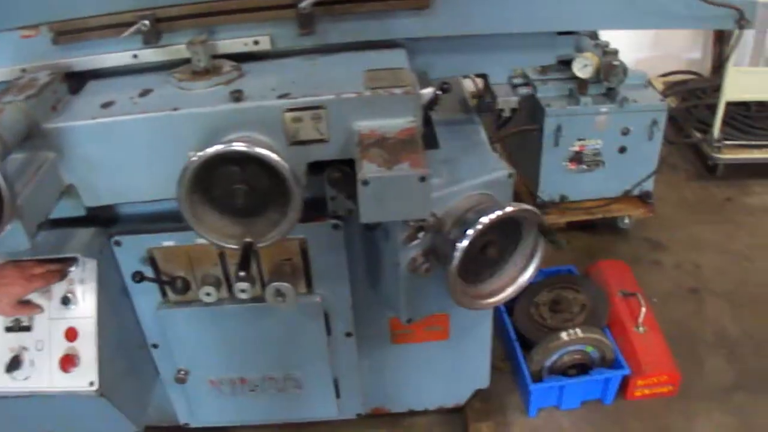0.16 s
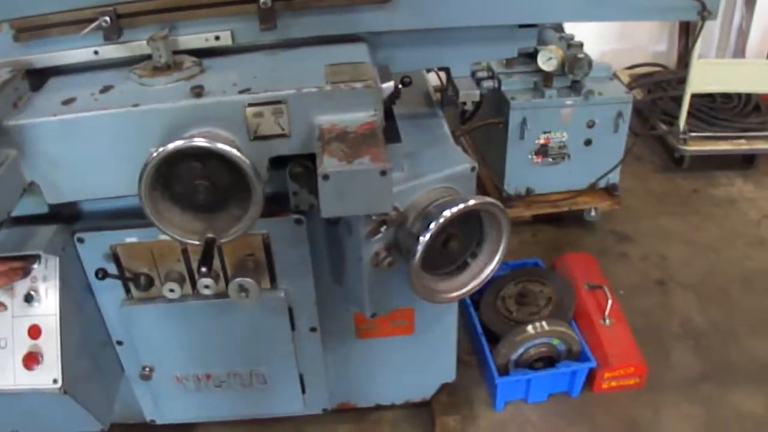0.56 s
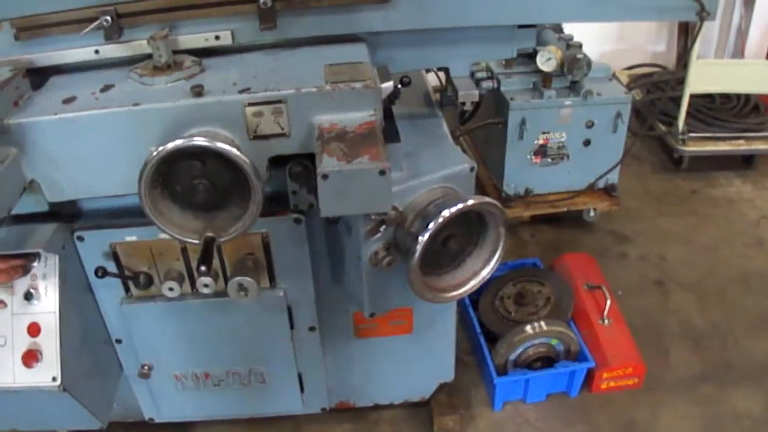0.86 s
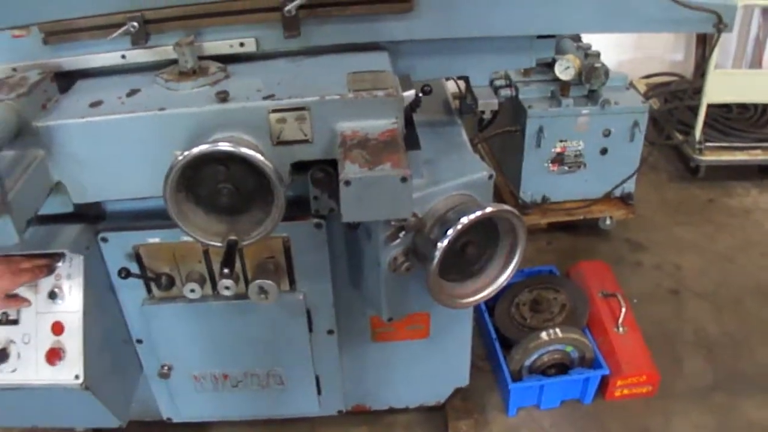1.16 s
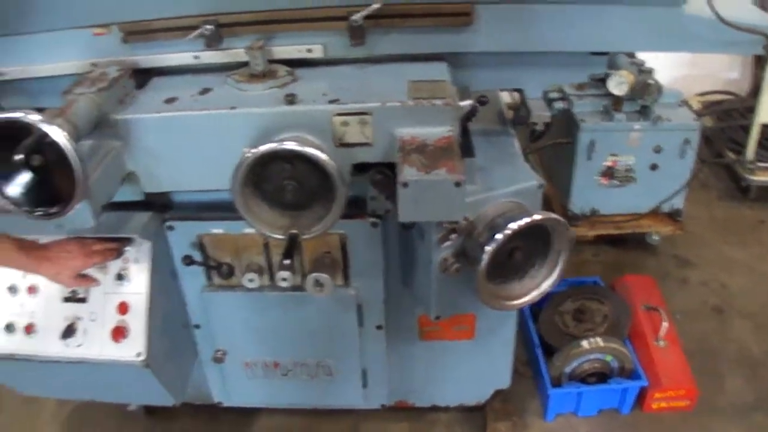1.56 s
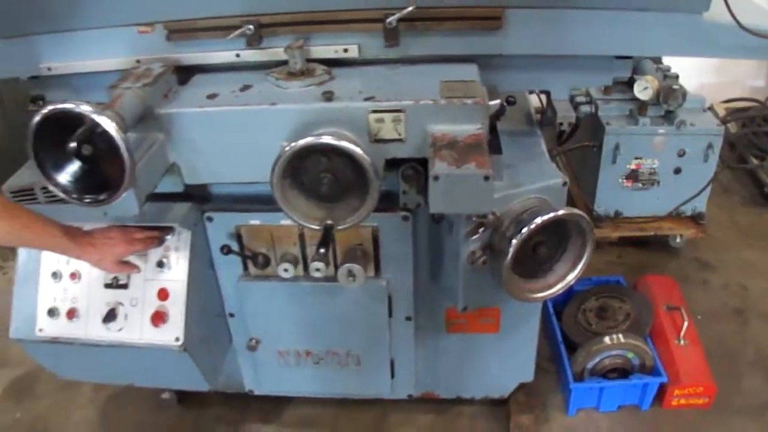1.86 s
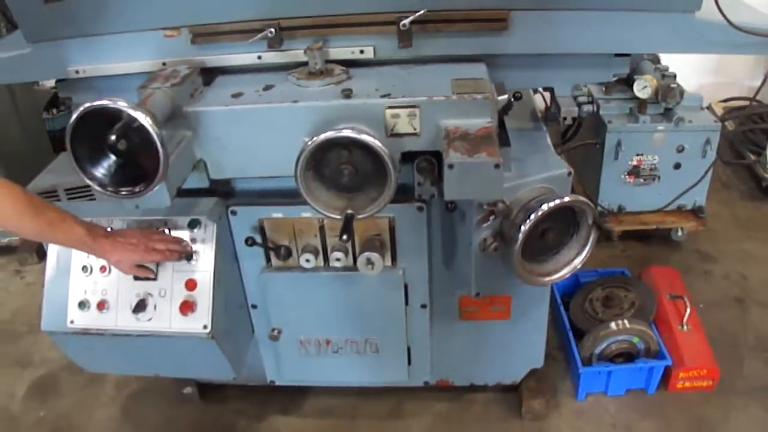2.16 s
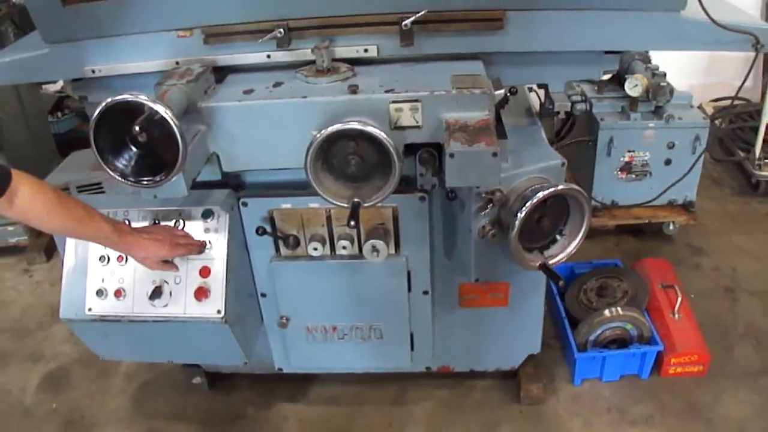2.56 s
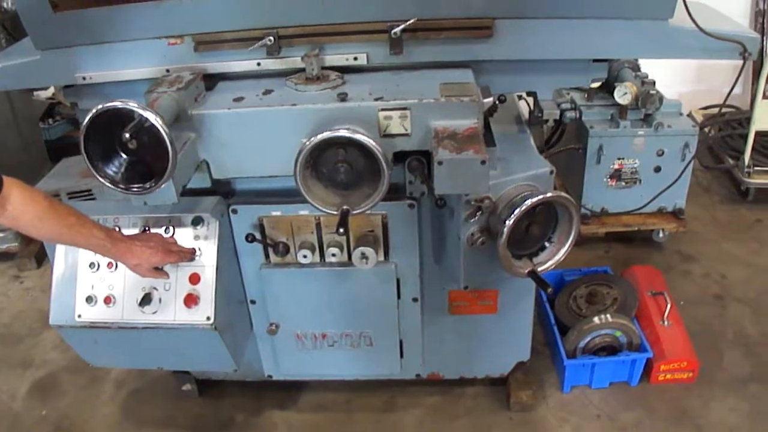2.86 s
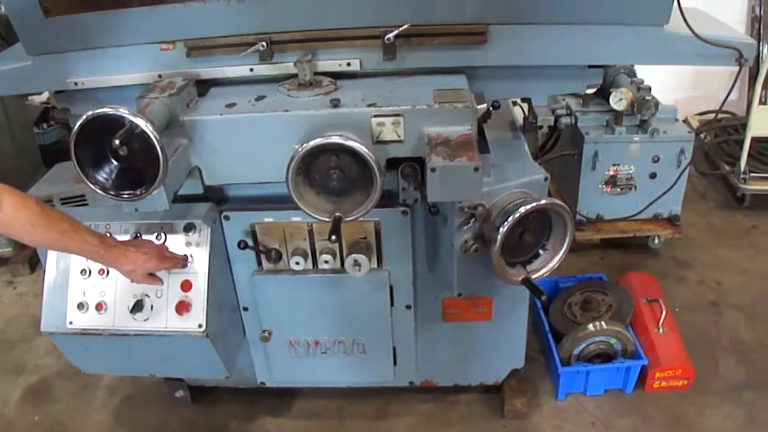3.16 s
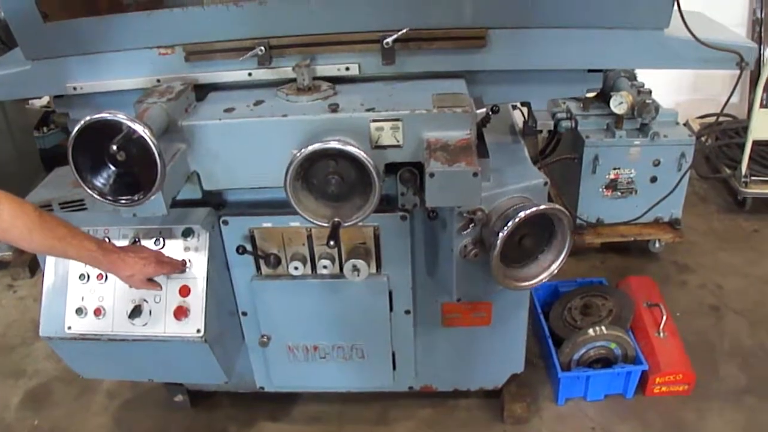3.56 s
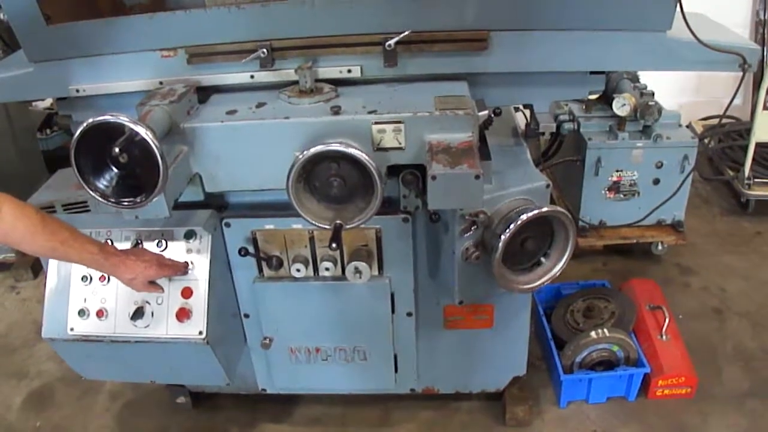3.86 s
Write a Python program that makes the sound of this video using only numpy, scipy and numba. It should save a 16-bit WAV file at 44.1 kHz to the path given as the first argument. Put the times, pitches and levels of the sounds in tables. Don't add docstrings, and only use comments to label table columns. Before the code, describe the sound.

A grinding machine whines and rattles with steady ticking, runs down, clacks, and starts up again.

```python
import sys
import numpy as np
from scipy import signal
from scipy.fft import rfft, irfft
from scipy.io import wavfile
from scipy.ndimage import uniform_filter1d
from numba import njit

SR = 44100
rng = np.random.default_rng(int(sys.argv[2]) if len(sys.argv) > 2 else 0)


def master(y):
    cut = np.clip(np.atleast_2d(y).T, -1, 1)
    pcm = np.round(cut * 32767)
    wavfile.write(sys.argv[1], SR, pcm.astype(np.int16))


def volts_from_db(level):
    exponent = np.asarray(level, float) / 20
    return 10 ** exponent


N = 176400
T = np.arange(N) / SR
TOOTH_HZ, TEETH = 464.1, 16
REVERSE_S, CONTACTOR_S = 3.0, 3.25


def level(x, rms_db):
    return x * volts_from_db(rms_db) / np.sqrt(np.mean(x ** 2))


def curve(table, axis=1):
    return np.interp(T, np.array(table)[:, 0], np.array(table)[:, axis])


def ring(x, hz, width_hz):
    return signal.lfilter(*signal.iirpeak(hz, hz / max(width_hz, 2), SR), x)


def ring_twice(x, hz, width_hz):
    return ring(ring(x, hz, width_hz), hz, width_hz)


def walk(rate_hz):
    k = int(SR / rate_hz)
    held = np.repeat(rng.standard_normal(N // k + 1), k)
    return 1.05 * uniform_filter1d(uniform_filter1d(held, k), k)[:N]


def colour(x, table):
    hz = np.arange(N // 2 + 1) * SR / N + 1
    points = np.array(table)
    gain_db = np.interp(np.log(hz), np.log(points[:, 0]), points[:, 1])
    return irfft(rfft(x) * volts_from_db(gain_db), N)


def grains(spread_db):
    return rng.standard_normal(N) * volts_from_db(spread_db * np.minimum(rng.exponential(size=N), 3.0))


def burst(rows, lead_s, tail_s):
    out = 0
    for s, db in rows:
        fall = np.where(T < s, (T - s) / lead_s * .5, (s - T) / tail_s)
        out = out + volts_from_db(db) * np.exp(fall - 1e3 * (abs(T - s) > .3))
    return out


# time_s, share_of_full
SPEED = [(0, 1), (1.95, 1), (2.0, .9), (2.12, .61), (2.3, .37), (2.45, .15), (2.7, .02), (3.25, .02),
         (3.3, .2), (3.41, .6), (3.46, .77), (3.51, .9), (3.555, .93), (3.58, 1), (4, 1)]
# time_s, level_db
LOAD = [(0, -2), (.25, -2), (1.2, -2.5), (1.6, -5.5), (1.86, -9), (1.93, -9), (2.0, -7), (3.55, -3),
        (3.62, -4.5), (3.75, -3), (3.87, -4), (4.0, -5)]
FORWARD_HZ = [354, 377.1, 464.1, 580.3, 610, 667, 725.3, 812.3, 841, 900, 928.2, 1145, 1218.5, 1305, 1392,
              1523, 2234]
FORWARD_DB = [-43.5, -41, -21, -44, -42.5, -40.5, -38.5, -39, -38.5, -36.5, -28.5, -38, -41.5, -42, -43,
              -45, -44.5]
BACKWARD_HZ = [467, 614, 934, 580, 860, 1020, 1250, 1390, 1530]
BACKWARD_DB = [-24, -23, -25.5, -28, -36, -36.5, -35, -40, -33.5]


def gears():
    speed = curve(SPEED)
    turns = np.cumsum(speed) / SR
    steady = np.clip((speed - .93) / .06, 0, 1)
    tooth_settled = np.clip((T - 3.6) / 0.033, 0, 1)
    out = 0
    for lines_hz, lines_db, on in ((FORWARD_HZ, FORWARD_DB, T < REVERSE_S),
                                   (BACKWARD_HZ, BACKWARD_DB, T >= REVERSE_S)):
        for hz, db in zip(lines_hz, lines_db):
            settled = tooth_settled if hz == BACKWARD_HZ[0] else on
            level_db = db + 4.5 + 0.05 * walk(29.84)
            if db < -31:
                level_db = level_db + 2.16 * walk(25.04)
            if db < -33:
                beat = TOOTH_HZ / TEETH / 5 * turns + rng.random()
                level_db = level_db + 3.0 * np.cos(2 * np.pi * beat)
            out = out + settled * volts_from_db(level_db) * np.sin(2 * np.pi * (hz * turns + rng.random()))
    return out * steady * volts_from_db(curve(LOAD))


# start_s, length_s, pitch_hz, rms_db
CROSSINGS = [(1.97, .05, 830, -31), (1.996, 0.046, 288.6, -37.5), (2.01, 0.037, 733, -30),
             (2.0, .09, 950, -33), (2.024, .035, 462, -31), (2.01, 0.11, 362, -36),
             (2.113, 0.076, 281, -32.5), (2.102, 0.21, 923, -35), (2.155, 0.029, 743, -31),
             (2.17, 0.1, 464, -35.5), (2.24, 0.044, 280, -38.5), (2.272, .07, 462, -38),
             (2.308, 0.11, 285, -40), (2.354, .16, 933, -43), (2.534, .03, 1600, -37),
             (3.36, .05, 1015, -33), (3.367, .04, 720, -33), (3.406, 0.062, 275, -26.5),
             (3.418, 0.034, 560, -28), (3.455, .045, 360, -30), (3.465, 0.034, 639, -25.5),
             (3.482, 0.022, 760, -25), (1.96, .04, 429, -32), (3.509, 0.071, 432, -25.5),
             (3.545, 0.17, 280, -41.5), (3.613, 0.068, 1490, -30.5), (3.653, .03, 1240, -28)]


def panels():
    edge_s, glide, rough_rad = 0.0077, .012, 0.28
    out = 0
    for s, d, hz, db in CROSSINGS:
        swell = np.clip((T - s) / edge_s / 2, 0, 1)
        shape = swell * np.exp(-np.clip(T - s - .6 * d, 0, 1) / (0.34 * d + edge_s))
        bent_s = T + np.sign(s - REVERSE_S) * glide * (T - s - d / 2) ** 2 / d
        phase = 2 * np.pi * hz * bent_s + rough_rad * walk(70) + 6 * rng.random()
        out = out + volts_from_db(db + 2.5 + 2.3 * walk(45)) * shape * np.sin(phase)
    return out


# pitch_hz, width_hz, level_db
CASTING = [(295, 29, -9), (356, 39, -5.5), (450, 45.4, -1.5), (607.6, 82, 3.5), (734, 59, -1),
           (813.4, 44, 3.5), (971, 75, -2), (1132, 69, 0.5), (1313, 112, -7), (1525, 89, 0),
           (1702, 216, -9), (2310, 403, -9.5), (2946, 266, -16)]
REVERSE_CASTING_DB = [-4, -4, 0, 0, -1.5, -2, -0.5, -0.5, -0.5, 0, 2.5, 0.5, -1.5]


def casting(x):
    out = 0
    for k, (hz, width_hz, db) in enumerate(CASTING):
        gain = volts_from_db(db + REVERSE_CASTING_DB[k] * (T > REVERSE_S))
        out = out + (-1) ** k * gain * ring(x, hz, width_hz)
    return out


# time_s, level_db
DRIVE = [(0, -1), (1.0, -2), (1.86, -0.5), (2.03, 0.5), (2.14, -3), (2.3, -10.5), (2.45, -15.5), (2.7, -32),
         (3.25, -46), (3.275, -15), (3.35, -9.5), (3.38, -5), (3.44, -2.5), (3.53, -0.5), (3.63, 1),
         (4.0, 0)]
# pitch_hz, density_db_per_hz
HISS = [(1470, 0.5), (2500, 4.5), (3060, -13), (3560, -13), (5840, -7), (8220, -4), (9120, -13),
        (10800, -30), (14000, -52), (22000, -120)]
# start_s, length_s, level_db
SQUEAKS = [(1.966, 0.11, -8.5), (2.183, 0.055, -15), (2.27, 0.076, -17), (3.415, .03, -19),
           (3.606, 0.087, -6), (3.79, 0.11, -6), (3.928, 0.075, -6.5)]


def rattle():
    spread_db, repeat_share = 3, .5
    tooth = TOOTH_HZ * np.cumsum(curve(SPEED)) / SR
    cycle = (tooth / (5 * TEETH) % 1 * 7602 + 8000 * (T > REVERSE_S)).astype(int)
    turn = (tooth / TEETH % 1 * 1520).astype(int)
    worn = grains(spread_db)[cycle]
    worn = worn + 0.19 * grains(spread_db)[turn]
    grit = repeat_share ** .5 * worn + (1 - repeat_share) ** .5 * grains(spread_db)
    contact = 0.37 + np.exp(-(tooth % 1) / 0.16)
    throb = volts_from_db(1.5 * np.cos(2 * np.pi * tooth / TEETH))
    knocks = level(grit * contact * throb, 0)
    body = level(level(casting(knocks), 0) + level(ring(knocks, 950, 1720), -8.5), -24.5)

    hiss = level(colour(grains(2.8), HISS), -36.5) * volts_from_db(2.0 * walk(10.97))
    bright = ring(hiss, 8470, 250) + 0.27 * ring(hiss, 7340, 180)
    hiss = hiss + 1.05 * volts_from_db(2.6 * walk(25.4)) * bright

    squeak = sum(volts_from_db(db) * np.exp(-((T - s - d / 2) / (d / 2)) ** 4) for s, d, db in SQUEAKS)
    squeak = squeak * volts_from_db(-37 + 3.0 + 3.6 * walk(60))
    squeak = squeak * np.sin(2 * np.pi * 6460 * T + 1.2 * walk(150))
    return body * volts_from_db(1.8 * walk(30.11) + curve(DRIVE)) + hiss * volts_from_db(1.44 * curve(DRIVE)) + squeak


# start_s, peak_db
TICKS = [(0.0044, -16), (0.173, -16), (0.344, -17), (0.5165, -17), (0.6906, -15), (0.8613, -17),
         (1.0346, -15), (1.206, -18.5), (1.379, -16.5), (1.5502, -15.5), (1.7243, -18.5), (1.895, -14.5),
         (2.112, -21.5), (3.496, -14.5), (3.673, -16.5), (3.8395, -17)]
# pitch_hz, level_db, t60_s
PAWL = [(3057, 0.5, 0.019), (3910, -14, 0.021), (5230, -3, 0.031), (5570, -2.5, 0.054), (7440, -2, 0.094),
        (8050, -0.5, 0.074), (8554, 4.5, 0.045), (9700, -28, 0.041)]


def pawl():
    lead_s, out_s = 0.0096, 0.016
    peaks = [(s + 0.0033, db) for s, db in TICKS]
    grit = level(grains(4.1), 0)
    sharp = burst(peaks, lead_s / 5, out_s * 0.48)
    drop = grit * (sharp + 0.23 * burst(peaks, lead_s * 0.69, out_s * 2.2))
    creep = 0.26 * grit * burst(peaks, lead_s, out_s * 0.57)
    late = [(s + 0.016, db + 3.3 * z) for (s, db), z in zip(peaks, rng.standard_normal(len(peaks)))]
    shiver = level(grains(3.2), -11) * volts_from_db(2.7 * walk(150)) * burst(late, .004, 0.037)
    out = 0
    for hz, db, t60_s in PAWL:
        gain = volts_from_db(db - (hz < 3500) * (T > REVERSE_S) * 6.3)
        out = out + gain * ring(drop + (hz > 7000) * creep, hz, 5.0 / t60_s)
    out = out + volts_from_db(-6) * ring(drop + .5 * shiver, 5600, 5100)
    out = out + ring(shiver, 7120, 430) + ring(shiver, 7520, 450) + 0.27 * ring(shiver, 10000, 1500)
    return volts_from_db(-1.5) * out


# pitch_hz, width_hz, level_db
KNOCK = [
    [(602, 54, -2), (825, 53, 1.5), (1156, 63, 0)],
    [(793, 80, -1), (1253, 54, -1)],
]


def cam():
    out = 0
    for modes, late_s, back in ((KNOCK[0], .088, False), (KNOCK[1], -.006, True)):
        push = np.zeros(N)
        push[[int((s + late_s) * SR) for s, db in TICKS if (s > REVERSE_S) == back and s + late_s < 4]] = 1
        for hz, width_hz, db in modes:
            out = out + volts_from_db(db) * SR / width_hz / 8 * ring_twice(push, hz, width_hz)
    return out * volts_from_db(-14 + curve(DRIVE) + 1.9 * walk(6.2))


# start_s, peak_db, pitch_hz
JOLTS = [(2.035, -20, 693), (2.474, -24, 944), (2.537, -24, 1290), (3.251, -21, 956), (3.369, -21, 720),
         (3.377, -30, 2470), (3.424, -20, 638), (3.474, -12, 700), (3.493, -10, 853), (3.57, -14, 931),
         (3.581, -10, 612)]


def jolts():
    t60_s, out = 0.039, 0
    for s, db, hz in JOLTS:
        age_s = np.clip(T - s, 0, 1)
        shape = volts_from_db(db - 60 * age_s / t60_s) * np.clip(age_s / 0.0024, 0, 1)
        tone = np.sin(2 * np.pi * hz * age_s) + 0.29 * np.sin(2 * np.pi * 0.797 * hz * age_s)
        out = out + shape * tone
    return out


# time_s, level_db
GRIND = [(2.5, -70), (2.58, -52), (2.64, -45), (2.69, -47), (2.75, -68), (3.25, -72), (3.29, -45.5),
         (3.38, -41.5), (3.47, -48), (3.6, -60)]


def grind():
    grit = grains(3.0) * volts_from_db(2.5 * walk(70))
    dull = ring(ring(grit, 2800, 2200), 2900, 2200)
    bright = ring_twice(grit, 5500, 4500)
    return np.where(T > REVERSE_S, level(dull, 0), level(bright, 0)) * volts_from_db(curve(GRIND))


# time_s, level_db
SCRAPE = [(2.42, -65), (2.455, -41), (2.5, -40), (2.545, -37), (2.575, -37), (2.61, -34.5), (2.65, -36.5),
          (2.7, -45.5), (2.85, -45.5), (3.0, -51)]
# pitch_hz, level_db
SCRAPE_COLOUR = [(180, -50), (300, -26), (460, -8), (760, -3.5), (1600, -4.5), (2250, -13), (8000, -20),
                 (10800, -37)]
# time_s, pitch_hz
SCRAPE_HZ = [(2.45, 1001), (2.55, 1602), (2.66, 2117)]
# start_s, peak_db
CLICKS = [(2.39, -39), (2.591, -25), (2.8594, -32), (2.8924, -30), (2.9248, -28), (2.9587, -23.5)]


def slide():
    rub_db = curve(SCRAPE)
    rub = level(colour(grains(3.3) * volts_from_db(2.7 * walk(60)), SCRAPE_COLOUR), 0) * volts_from_db(rub_db)
    rub = rub + ring(rub, 6500, 4700) * volts_from_db(0.93 * (rub_db - max(db for s, db in SCRAPE)))
    carrier = np.cos(2 * np.pi * np.cumsum(curve(SCRAPE_HZ)) / SR)
    band = level(ring(rng.standard_normal(N), 60, 250) * carrier, -4.0)
    band = band * volts_from_db(rub_db - 60 * np.clip(T - 2.66, 0, 1))
    clicks = rng.standard_normal(N) * burst(CLICKS, 0.00027, 0.0015)
    creaks = ring_twice(clicks, 3500, 1200) + volts_from_db(-6.0) * ring_twice(clicks, 6900, 2200)
    return rub + band + volts_from_db(-2) * creaks


# pitch_hz, level_db, t60_s
CONTACTOR = [(530, 2.5, 0.014), (950, -1, 0.02), (1430, -3, 0.029), (4800, -5, 0.011), (6840, -12, 0.011)]


def contactor():
    bounces = [(CONTACTOR_S + 0.0012, 0), (CONTACTOR_S + 0.014, -1), (CONTACTOR_S + .04, -12)]
    hit = level(grains(1.1), 0) * burst(bounces, 0.0019, 0.02)
    box = sum(volts_from_db(db + 12) * ring(hit, hz, 5.1 / t60_s) for hz, db, t60_s in CONTACTOR)
    snap = volts_from_db(-8.0) * ring(ring(hit, 2500, 6000), 3800, 7000)
    return volts_from_db(-32) * (box + snap + volts_from_db(-13) * ring_twice(hit, 7500, 3000))


@njit
def walls(x, lags, gain, damp):
    line, soft, out = np.zeros((8, 8192)), np.zeros(8), np.zeros(len(x))
    for i in range(len(x)):
        total = 0.
        for k in range(8):
            soft[k] += (1 - damp) * (gain[k] * line[k, (i - lags[k]) & 8191] - soft[k])
            total += soft[k]
        out[i] = soft[0] - soft[3] + soft[5] - soft[6]
        for k in range(8):
            line[k, i & 8191] = x[i] + soft[k] - total / 4
    return out


# pitch_hz, density_db_per_hz
SHOP = [(30, -24), (100, -19.5), (150, -11), (270, -6.5), (1060, -13), (1830, -20.5), (7400, -32),
        (10800, -32)]
# pitch_hz, rms_db
HUMS = [(120, -69), (183, -57.5), (240, -60), (463, -62), (931, -56), (1082, -57), (7870, -62)]


def shop():
    hums = 0
    for hz, db in HUMS:
        cut_db = 30 * (hz > 7000) * (T > CONTACTOR_S)
        level_db = db + 4.0 + 2.0 * walk(9.16) - cut_db
        hums = hums + volts_from_db(level_db) * np.sin(2 * np.pi * (hz * T + rng.random()))
    murmur = level(colour(rng.standard_normal(N), SHOP), -47.5 - 3.0)
    return murmur * volts_from_db(1.0 * walk(6.5)) + hums


def scene():
    room_t60_s, room_damp, room_db = 1.0, 0.44, -11.5
    clatter = rattle() + pawl() + slide() + contactor() + cam() + jolts() + grind()
    lags = rng.integers(900, 3500, size=8)
    room = walls(clatter, lags, volts_from_db(-60 * lags / SR / room_t60_s), room_damp)
    near = gears() + panels() + clatter + volts_from_db(room_db) * room
    low_cut = signal.butter(4, 210, "high", fs=SR, output="sos")
    return (signal.sosfilt(low_cut, near) + shop())[None]


def band_limit(x):
    return signal.sosfilt(signal.butter(12, 13850, fs=SR, output="sos"), x)


def record(dry):
    top_cut = signal.ellip(10, .2, 80, 10780, fs=SR, output="sos")
    direct = signal.sosfilt(top_cut, np.tanh(1.5 * dry) / 1.5)
    mirror_band = signal.butter(6, [12950, 13500], "band", fs=SR, output="sos")
    image = signal.sosfilt(mirror_band, dry * (-1.) ** np.arange(N))
    return band_limit(direct + volts_from_db(-39.5) * image)


dry = scene()
out = record(dry)
master(out)
```